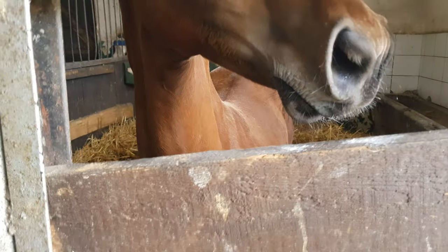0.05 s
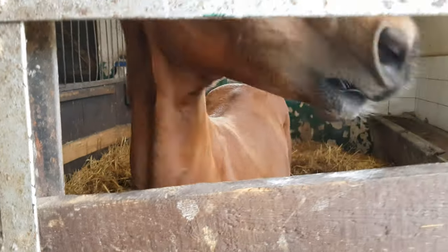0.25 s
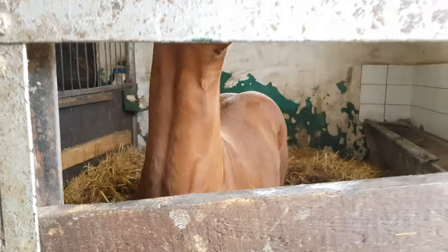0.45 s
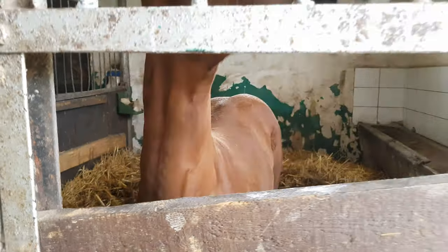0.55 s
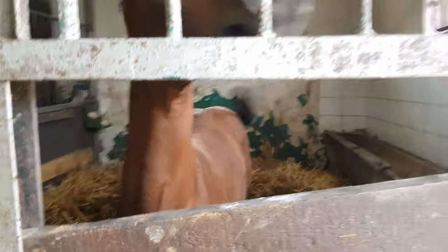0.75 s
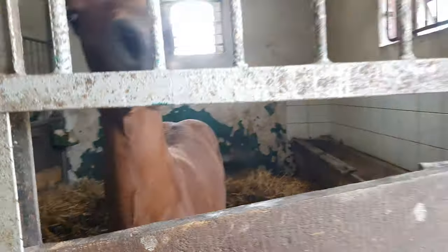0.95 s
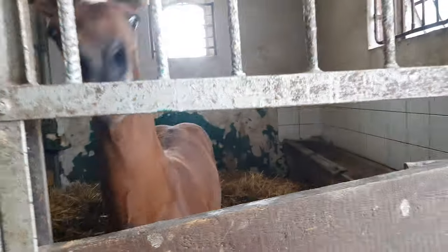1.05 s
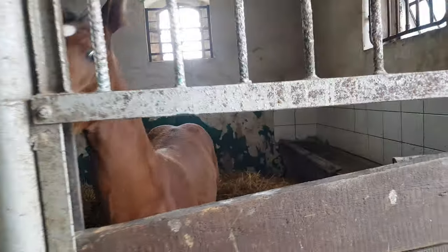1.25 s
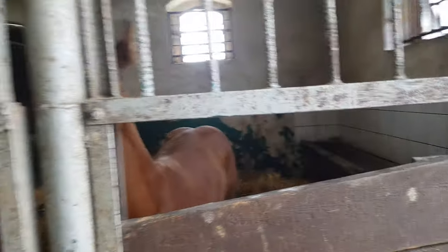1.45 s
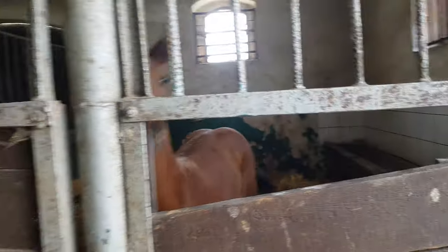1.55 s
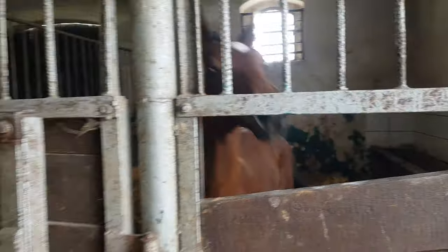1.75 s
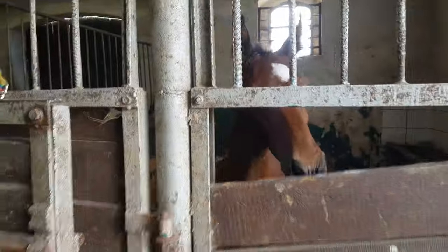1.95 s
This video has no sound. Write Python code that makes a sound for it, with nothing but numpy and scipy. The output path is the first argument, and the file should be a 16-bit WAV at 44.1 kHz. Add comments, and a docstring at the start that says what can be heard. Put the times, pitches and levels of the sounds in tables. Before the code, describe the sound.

A horse whinnies close by in a quiet stall. First, at about 0.2 seconds, comes a dull knock on boards with a soft scuff. From 0.3 seconds the horse holds a high, breathy squeal over a lower buzz. At 0.7 it breaks into seven raspy shakes, loudest near 0.9, weakening into low chesty flutters that end around 1.7 seconds. The walls add a short echo.

```python
"""A horse whinnies in its stall

A dull knock on the stall front, then a horse whinnies close by. Its voice has two pitches at once,
a high whistle and a low buzz. It holds a squeal, then gives seven shakes that each arch, sag and
break into rasp, the last ones dropping to a chesty flutter. Tiled walls answer."""
import sys
import numpy as np
from scipy import signal
from scipy.fft import rfft, irfft, next_fast_len
from scipy.io import wavfile
from scipy.ndimage import uniform_filter1d, minimum_filter1d, map_coordinates

SR = 44100
rng = np.random.default_rng(int(sys.argv[2]) if len(sys.argv) > 2 else 0)


def store_pcm(level_fs):
    """Save levels as 16-bit WAV."""
    pcm = np.round(np.clip(level_fs, -1, 1) * 32767).astype(np.int16)
    wavfile.write(sys.argv[1], SR, np.atleast_2d(pcm).T)


N = 88200
TOP_HZ = 15900  # the highest frequency kept


def amp(db):
    """Turn decibels into a number to multiply by."""
    return 10 ** (np.asarray(db) / 20)


def clock():
    """The time in seconds at every sample."""
    return np.arange(N) / SR


def along(points, hz):
    """Look up a frequency between the rows of a table, on a musical (log) scale."""
    freqs, values = np.transpose(points)
    return np.interp(np.log(hz + 1), np.log(freqs + 1), values)


def curves(rows):
    """Join a table's rows with straight lines: one curve for each column after the time."""
    times, *columns = np.transpose(rows)
    return [np.interp(clock(), times, column) for column in columns]


def wobble(rate):
    """A smooth curve through `rate` random values a second."""
    return map_coordinates(rng.standard_normal(8000), [clock() * rate], mode="wrap")


def filtered(x, response):
    """Turn each frequency up or down as `response` says."""
    size = next_fast_len(N + 8192)
    return irfft(rfft(x, size) * response(np.fft.rfftfreq(size, 1 / SR)), size)[..., :N]


def noise(colour, gate=1):
    """Noise of average power 1: `colour` sets its mix of lows and highs, `gate` makes it pulse."""
    x = filtered(gate * rng.standard_normal(N), lambda hz: amp(along(colour, hz)))
    return x / np.sqrt(np.mean(x ** 2) + 1e-20)


# The colours of the air and the rumble. Each row: frequency in Hz, relative level in dB.
AIR_COLOUR = [(10, -31.5), (50, -3.5), (244, -1.5), (650, -3), (900, -22.5), (1530, -11.5), (4450, -8.5),
              (7500, -25), (15000, -17)]
RUMBLE_COLOUR = [(8, -48), (25, -9), (55, 8), (90, -6), (160, -4.5), (400, -11), (1000, -56)]
# How the rumble swells. Each row: time in seconds, level in dB.
RUMBLE_LEVELS = [(0, -67.5), (.17, -56), (.27, -41), (.36, -55), (.6, -64.5), (.8, -61.5), (1.3, -67),
                 (1.68, -63), (1.76, -66.5), (2, -96)]


def background(air_db=-75):
    """The faint hush of still air, with a low rumble."""
    air = amp(air_db) * np.array([noise(AIR_COLOUR), noise(AIR_COLOUR)])
    return air + amp(curves(RUMBLE_LEVELS)[0]) * noise(RUMBLE_COLOUR)


# How long the stall rings. Each row: frequency in Hz, seconds to fade by 60 dB.
STALL_RING = [(100, .45), (260, .6), (600, .45), (2000, .4), (6000, .42), (14000, .4)]


def stall_echo(x, tail_db=-13, bounces_db=-9, spread_s=.02, bounces=14):
    """Sound bounces off the near walls, then blurs into a tail whose high notes die first."""
    hz, t, spectrum = signal.stft(rng.standard_normal((2, SR)), SR, nperseg=256)
    fade = np.exp(-np.log(1000) * t / along(STALL_RING, hz)[:, None])
    tail = signal.istft(spectrum * fade, SR, nperseg=256)[1]
    echo = amp(tail_db) * tail / np.linalg.norm(tail[0])
    for channel in echo:
        delays = (rng.uniform(0, spread_s, bounces) * SR).astype(int)
        channel[delays] += amp(bounces_db) * rng.choice([-1, 1], bounces) / np.sqrt(bounces)
    echo = np.pad(echo, ((0, 0), (SR // 500, 0)))  # starts 2 ms late
    return signal.fftconvolve(x, echo, axes=1)[:, :N]


# How the scuff swells. Each row: time in seconds, level in dB.
SCUFF_LEVELS = [(0, -56.5), (.1, -56.5), (.15, -43.5), (.188, -34), (.21, -44), (.28, -47), (.33, -90)]
# Its colour. Each row: frequency in Hz, relative level in dB.
SCUFF_COLOUR = [(59, -39.5), (100, -0.5), (246, -9), (1050, -6.5), (3760, -14.5), (6220, -20.5),
                (8520, -74), (9660, -30), (15000, -21.5)]


def scuff():
    """A soft scuffing noise around the knock."""
    return amp(curves(SCUFF_LEVELS)[0]) * np.array([noise(SCUFF_COLOUR), noise(SCUFF_COLOUR)])


# The hits that make up the knock. Each row: start in seconds, clack level in dB, seconds for the
# clack to fade by 60 dB, thump level in dB, frequency in Hz above which the clack is dulled.
HITS = [(0.192, -21, 0.082, -29, 6137), (0.197, -39, 0.019, -16.5, 2475), (.238, -24, 0.028, -40, 1100)]
# The boards' notes. Each row: pitch in Hz, dB added to the thump level, seconds to fade by 60 dB.
BOARD_NOTES = [(62.3, -16.5, 0.19), (126, 4, .085), (172, -13, .05), (269, -21, 0.12)]
# The clack's colour. Each row: frequency in Hz, relative level in dB.
CLACK_COLOUR = [(150, -25), (250, -11.5), (471, -16.5), (1540, -17), (3440, -29), (4010, -52), (5010, -28),
                (8380, -71.5), (11400, -37), (15000, -43)]


def knock():
    """Each hit on the stall front gives a clack and a low thump of the boards."""
    out = np.zeros(N)
    for start, clack_db, fade_s, thump_db, bright_hz in HITS:
        t = np.maximum(clock() - start, 0)
        clack = filtered(noise(CLACK_COLOUR), lambda hz: 1 / (1 + (hz / bright_hz) ** 2))
        out += amp(clack_db - 60 * t / fade_s) * (t > 0) * clack
        for hz, db, ring_s in BOARD_NOTES:
            out -= amp(thump_db + db - 60 * t / ring_s) * np.sin(2 * np.pi * hz * t)
    return out


# The head's swing. Each row: time in seconds, dB louder on the left, milliseconds earlier on the left.
HEAD_PATH = [(.3, -.5, -.11), (.6, -2.5, -0.12), (.8, -1, -0.0097), (1.0, 1.5, 0.11), (1.17, 2.5, .15),
             (1.35, 0.5, 0.24), (1.65, 0, 0.17)]
# A steady tilt on top of that. Each row: frequency in Hz, dB louder on the left.
LEFT_TILT = [(200, 1.5), (1700, 3), (2400, 5.5), (3000, 9), (4800, 9), (6300, 0), (9000, -0.5),
             (15000, -3.5)]


def head_swing(x):
    """As the head swings left, its sound reaches the left microphone sooner and louder."""
    sides = np.array([[.5], [-.5]])  # left, right
    pan_db, lead_ms = curves(HEAD_PATH)
    times = clock() + sides * lead_ms / 1000
    pair = np.array([map_coordinates(x, [t * SR], order=5) for t in times])
    return filtered(pair * amp(sides * pan_db), lambda hz: amp(sides * along(LEFT_TILT, hz)))


def trembling_phase(hz, jitter, rate):
    """The growing angle of a wave whose pitch trembles by about the fraction `jitter`."""
    return 2 * np.pi * np.cumsum(hz * (1 + jitter * wobble(rate))) / SR


# Chest flutters. Each row: middle in seconds, half-width in seconds, pitch in Hz, level in dB.
FLUTTERS = [(1.25, 0.04, 134.8, -56), (1.395, 0.014, 155.4, -33), (1.557, 0.031, 129, -35),
            (1.676, 0.037, 238, -43)]


def chest(overtone_db=-13):
    """Short, low flutters of the chest around the last shakes."""
    out = np.zeros(N)
    for middle, half_width, hz, db in FLUTTERS:
        phase = trembling_phase(hz, jitter=.06, rate=110)
        swell = amp(db) * np.exp(-((clock() - middle) / half_width) ** 2)
        out += swell * np.sqrt(2) * (np.sin(phase) + amp(overtone_db) * np.sin(2 * phase))
    return out


# The opening squeal. Each row: time in seconds, whistle pitch in Hz, low voice pitch in Hz.
SQUEAL = [(.285, 1744, 661), (.312, 1571, 756), (.375, 1730, 863.7), (.44, 1638, 703.6),
          (.475, 1671, 633.2), (.53, 1687, 839), (.58, 1710, 740.5), (.625, 1754, 928.6),
          (.66, 1658, 943.5), (.695, 1711, 658.3)]
# The shakes. Each row: time of the peak in seconds, length of the sag in seconds, whistle at the peak
# in Hz, low voice at the peak in Hz, low voice after the sag in Hz, whistle boost in dB.
SHAKES = [(0.742, .056, 1870, 745, 530, 7), (0.88, 0.061, 1880, 690, 491.4, -1),
          (1.026, 0.066, 1862, 680, 461.9, 4), (1.165, 0.072, 1795, 660, 359.3, 2.5),
          (1.305, .092, 1615, 560, 149.8, -7), (1.455, 0.095, 1732, 560, 134.9, -14),
          (1.593, .078, 1590, 610, 189.6, 2)]


def melody(whistle_follows=.48):
    """Both pitches, the depth of the sag (0 to 1) and the whistle's boost: each shake is an arch."""
    t = clock()
    peak_s, sag_s, high, low, low_end, boost_db = np.transpose(SHAKES)
    high_end = high * (low_end / low) ** whistle_follows  # the whistle sags less than the low voice
    times = np.append(SQUEAL[-1][0], np.column_stack([peak_s, peak_s + sag_s]))
    steps = np.arange(len(times))  # odd steps are peaks
    place = np.interp(t, times, steps)
    peak = 2 * np.floor(place / 2) + 1
    arch = peak + (place - peak) * np.abs(place - peak)  # lingers at each peak

    def join(held, at_peak, after_sag):
        """Follow the squeal, then the arches."""
        values = np.append(held[-1], np.column_stack([at_peak, after_sag]))
        return np.where(t < times[0], held, np.interp(arch, steps, values))

    held_high, held_low = curves(SQUEAL)
    zero = np.zeros(N)
    sag = join(zero, np.zeros_like(peak_s), np.ones_like(peak_s))
    return (join(held_high, high, high_end), join(held_low, low, low_end),
            sag, join(zero, boost_db, boost_db))


# The whistle's overtones. Each row: time in seconds, then the levels at twice and at three times
# its pitch, in dB compared with the main tone.
OVERTONES = [(.3, -24, -4), (.45, -5, -10.5), (.55, -1, -1), (.61, -12.5, 3.5), (.66, -3, 0.5),
             (.71, -7.5, -4), (.75, -16, -21.5), (1.2, -15, -23.5)]


def whistle(hz, low_phase, shaking, sag, shimmer_db=1):
    """The high voice: three tones that throb with the low voice and get rougher in the sags."""
    phase = trembling_phase(hz, jitter=.004 + .003 * shaking + .028 * sag, rate=700)
    second_db, third_db = curves(OVERTONES)
    tone = np.sin(phase) + amp(second_db) * np.sin(2 * phase) + amp(third_db) * np.sin(3 * phase)
    throb = 1 + (.017 + .061 * shaking) * np.cos(low_phase)
    return np.sqrt(2) * tone * throb * amp(shimmer_db * wobble(250))


def buzz(colour, hz, phase):
    """The low voice: tones at whole multiples of its pitch glide through a colour that stays put."""
    gains = [amp(along(colour, k * hz)) * (k * hz < TOP_HZ) for k in range(1, 24)]
    stack = sum(g * np.sin(k * phase + rng.uniform(0, 2 * np.pi)) for k, g in enumerate(gains, 1))
    return stack / np.sqrt(sum(g * g for g in gains) / 2)


# How the voice's parts rise and fall. Each row: time in seconds, then relative levels in dB of the
# whistle, the low voice, the throat rasp and the nostril hiss.
VOICE_LEVELS = [(0.27, -61, -53, -66.5, -49.5), (0.286, -34.5, -48, -40.5, -35.5),
                (0.314, -27, -43, -38, -28), (0.342, -25.5, -43, -30, -29), (0.354, -23.5, -46, -33, -25.5),
                (0.43, -24, -59, -31.5, -23.5), (0.446, -23.5, -48.5, -39.5, -23.5),
                (0.508, -19.5, -58.5, -29, -21.5), (0.576, -22.5, -48.5, -35.5, -23),
                (0.628, -17, -47, -34, -24.5), (0.652, -21, -40.5, -32.5, -24), (0.702, -17, -49, -36, -26),
                (0.738, -21.5, -28.5, -21, -21.5), (0.782, -11.5, -31.5, -10.5, -20),
                (0.814, -19, -41, -25.5, -30.5), (0.834, -17.5, -51, -51, -39),
                (0.874, -9.5, -31, -16.5, -22.5), (0.896, -2, -26, -12.5, -15),
                (0.936, -11, -35, -20, -29.5), (0.984, -28, -56, -46, -39.5), (1.008, -18, -39, -24, -25.5),
                (1.036, -15, -37.5, -23.5, -27), (1.072, -24.5, -33.5, -24.5, -26),
                (1.138, -35.5, -49, -37.5, -45), (1.158, -17, -39, -29, -29.5),
                (1.182, -22.5, -37.5, -23, -31.5), (1.21, -23, -37.5, -23, -34),
                (1.242, -24.5, -34, -36, -49), (1.29, -42, -51.5, -36, -50),
                (1.316, -40.5, -37.5, -25.5, -33), (1.36, -36, -38.5, -24, -33),
                (1.388, -61, -31.5, -35, -47.5), (1.436, -51.5, -44, -36.5, -39.5),
                (1.476, -34, -39.5, -26, -31), (1.554, -34, -35.5, -43.5, -53),
                (1.594, -38, -46.5, -30, -47.5), (1.622, -25.5, -36, -33.5, -45.5),
                (1.638, -32, -35, -26.5, -35), (1.666, -44.5, -32, -67, -42.5),
                (1.72, -75.5, -39, -50, -47)]
WHISTLE_TRIM_DB, LOW_TRIM_DB, RASP_TRIM_DB, HISS_TRIM_DB = -2, 3.5, 2.5, -.5
# The colours of the low voice, the rasp and the hiss. Each row: frequency in Hz, relative level in dB.
THROAT_COLOUR = [(100, -27.5), (200, -13.5), (350, -9), (520, -8), (720, 7.5), (900, -15.5), (1200, -6),
                 (1600, -11.5), (2200, -15.5), (3000, -15), (6000, -45.5)]
RASP_COLOUR = [(200, -63.5), (600, -13.5), (1000, -10.5), (1450, -10), (1750, 5), (2080, 7), (2420, 6),
               (2650, -10), (3400, -41.5), (6000, -58.5)]
SQUEAL_HISS_COLOUR = [(1500, -57), (2600, -6.5), (3000, 5.5), (3700, -6), (4400, -0.5), (5100, 4.5),
                      (6100, 8.5), (6750, -2.5), (7200, -19), (8100, -46), (8900, -17.5), (10000, -41.5),
                      (12000, -11), (15500, -22)]
SHAKE_HISS_COLOUR = [(1500, -29.5), (2600, -4), (3100, 4), (3550, 1.5), (4050, -2), (4600, -8), (5300, 0),
                     (6400, -5), (6900, -11), (7400, -43), (8300, -39), (10500, -19), (12500, -18),
                     (14500, -14.5), (15800, -32)]


def whinny(start_s=.281, rise_s=.0035, stop_s=1.65, fall_s=.043, sag_loss_db=14, flicker_db=2.6):
    """The horse's call: a whistle over a low voice, a rasping throat and hissing nostrils."""
    t = clock()
    high_hz, low_hz, sag, boost_db = melody()
    whistle_db, low_db, rasp_db, hiss_db = curves(VOICE_LEVELS)
    shaking = np.interp(t, [SQUEAL[-1][0], SHAKES[0][0]], [0, 1])
    tired = np.interp(t, [SHAKES[2][0], SHAKES[4][0]], [0, 1])
    low_phase = trembling_phase(low_hz, jitter=.012 + .004 * shaking + .035 * sag, rate=600)
    puffs = (1 + .81 * np.cos(low_phase / 2)) * amp(flicker_db * wobble(160))

    def hoarse(colour, buzz_share):
        """Part buzz, part rushing air that puffs on every other wave of the low voice."""
        tone = buzz(colour, low_hz, low_phase) * amp(flicker_db * wobble(200))
        return np.sqrt(buzz_share) * tone + np.sqrt(1 - buzz_share) * noise(colour, puffs)

    hiss = np.sqrt(1 - shaking) * hoarse(SQUEAL_HISS_COLOUR, buzz_share=.35)
    hiss += np.sqrt(shaking) * hoarse(SHAKE_HISS_COLOUR, buzz_share=.4)
    high = whistle(high_hz, low_phase, shaking, sag)
    low = hoarse(THROAT_COLOUR, buzz_share=.9 * (1 - .45 * tired))  # breathier in the last shakes
    rasp = hoarse(RASP_COLOUR, buzz_share=.5)
    voice = (amp(whistle_db + WHISTLE_TRIM_DB + boost_db - sag_loss_db * sag) * high
             + amp(low_db + LOW_TRIM_DB) * low
             + amp(rasp_db + RASP_TRIM_DB) * rasp
             + amp(hiss_db + HISS_TRIM_DB) * hiss)
    return voice * np.interp(t, [start_s, start_s + rise_s, stop_s, stop_s + fall_s], [0, 1, 1, 0])


def scene():
    """The horse and the knock echo in the stall, over a scuff and a faint background."""
    horse = head_swing(whinny() + chest())
    bump = np.tile(knock(), (2, 1))
    return horse + bump + scuff() + background() + stall_echo(horse + amp(-7.5) * bump)


def record(dry, low_cut_hz=30, ceiling=.98, smooth_s=.004):
    """Cut the deepest bass, briefly turn down any peak that is too loud, then cut the very top."""
    x = filtered(dry, lambda hz: (1j * hz / (low_cut_hz + 1j * hz)) ** 2)
    needed_gain = ceiling / np.maximum(np.abs(x).max(axis=0), ceiling)
    size = int(smooth_s * SR)
    smooth_gain = uniform_filter1d(minimum_filter1d(needed_gain, 2 * size), size)
    return filtered(x * smooth_gain, lambda hz: hz < TOP_HZ)


dry = scene()
out = record(dry)
store_pcm(out)
```